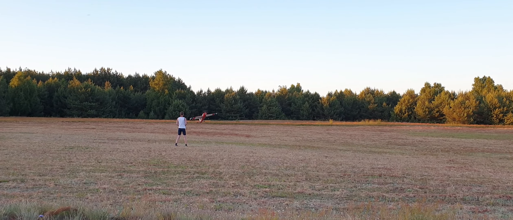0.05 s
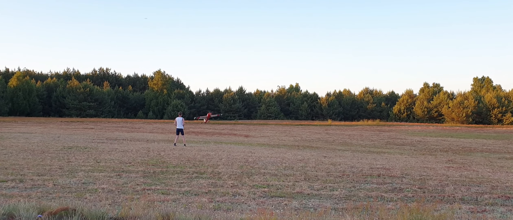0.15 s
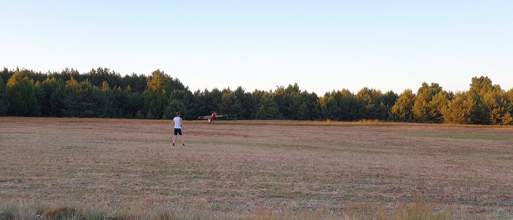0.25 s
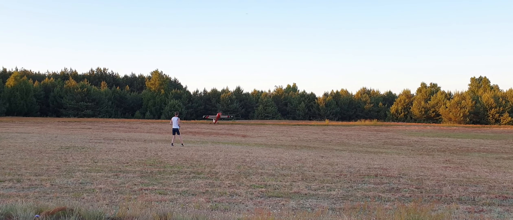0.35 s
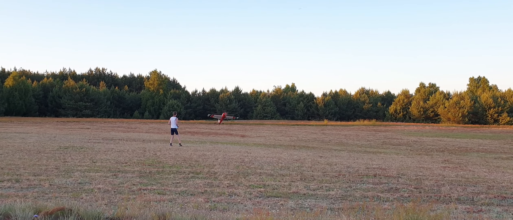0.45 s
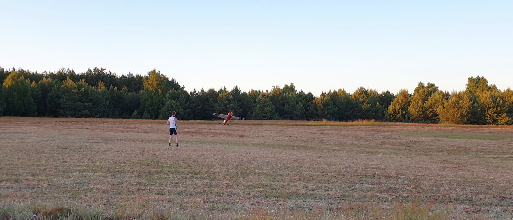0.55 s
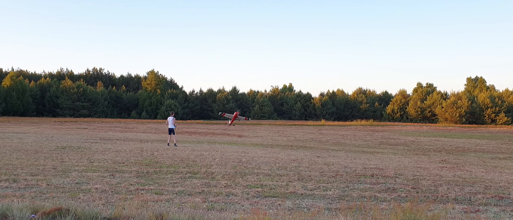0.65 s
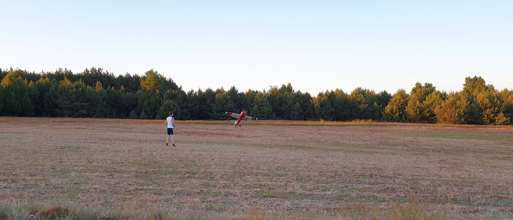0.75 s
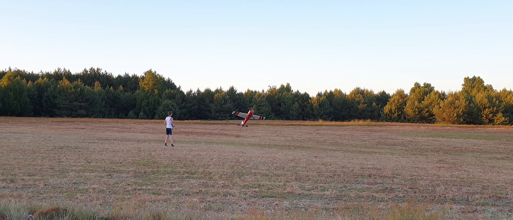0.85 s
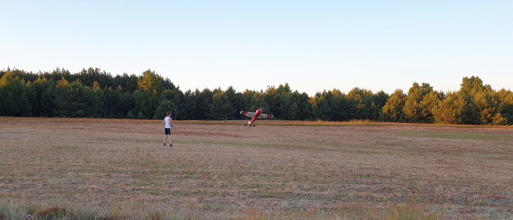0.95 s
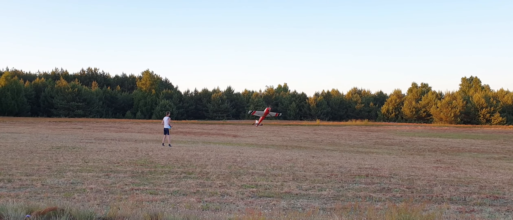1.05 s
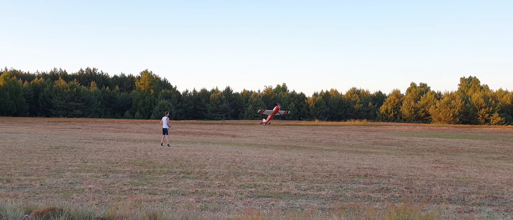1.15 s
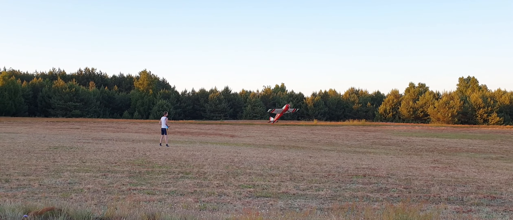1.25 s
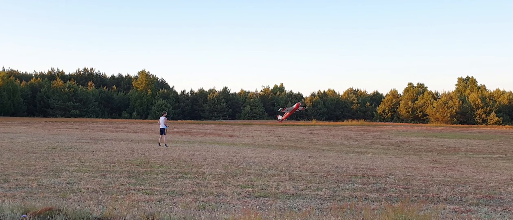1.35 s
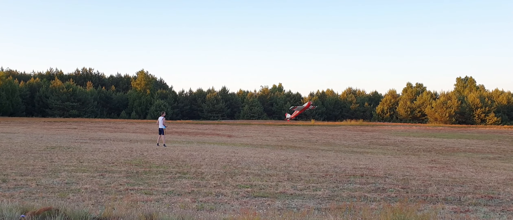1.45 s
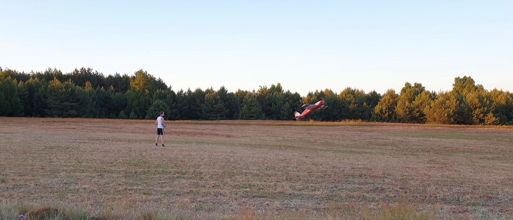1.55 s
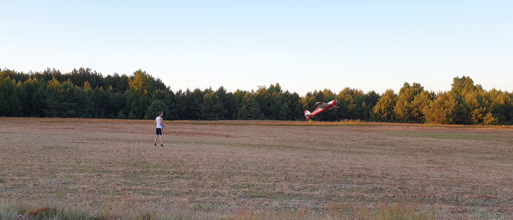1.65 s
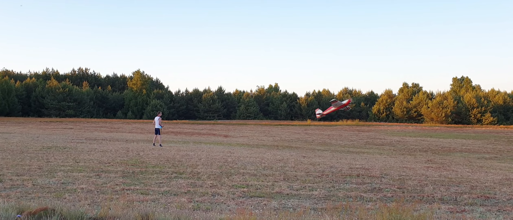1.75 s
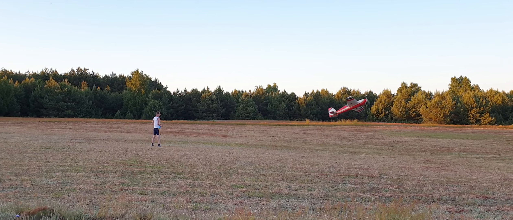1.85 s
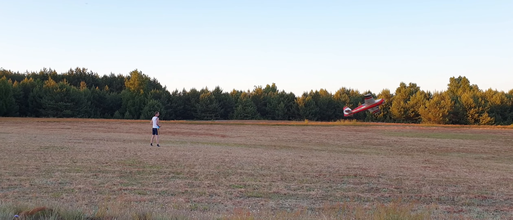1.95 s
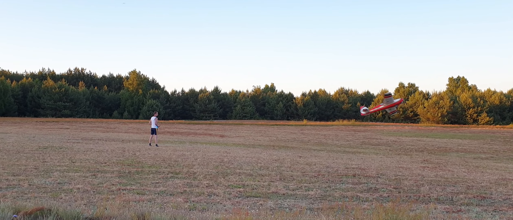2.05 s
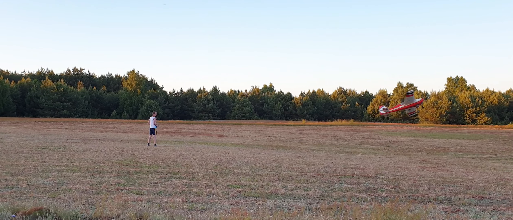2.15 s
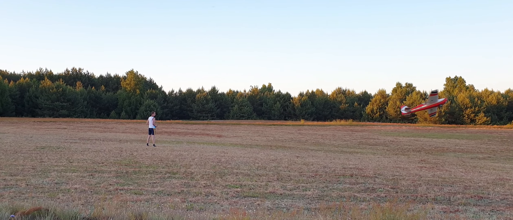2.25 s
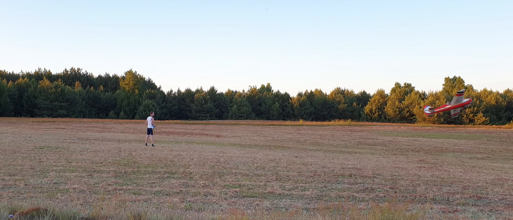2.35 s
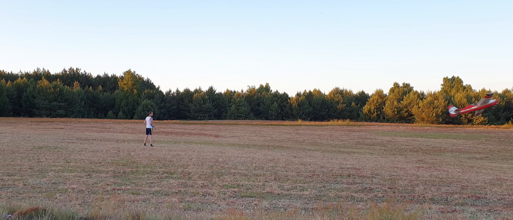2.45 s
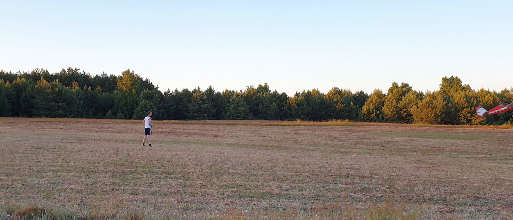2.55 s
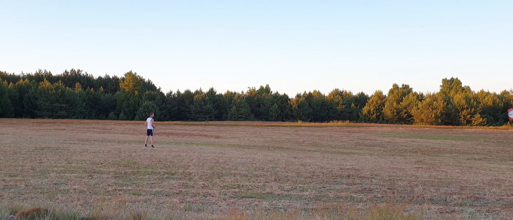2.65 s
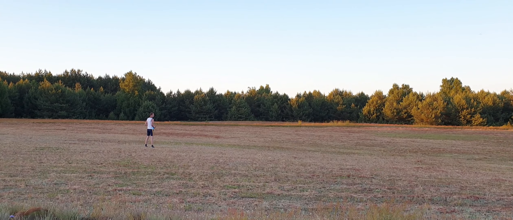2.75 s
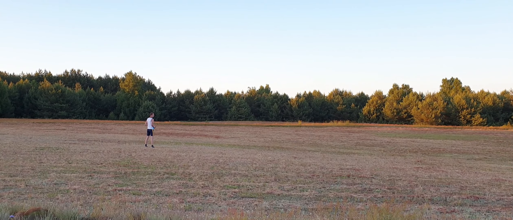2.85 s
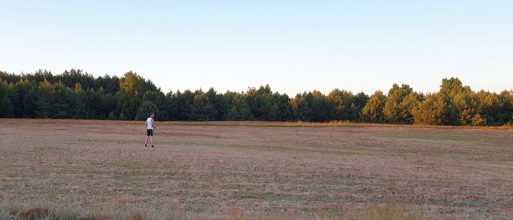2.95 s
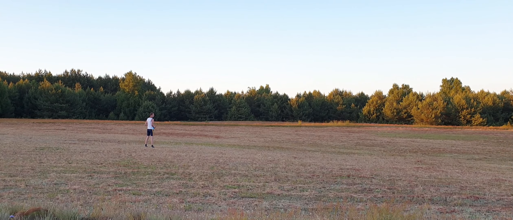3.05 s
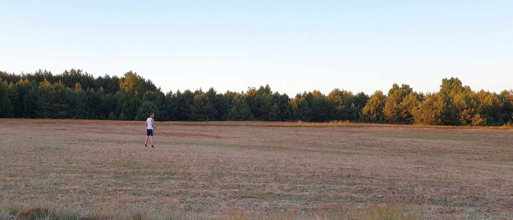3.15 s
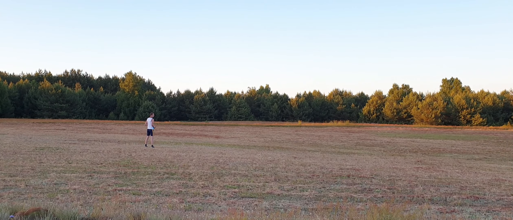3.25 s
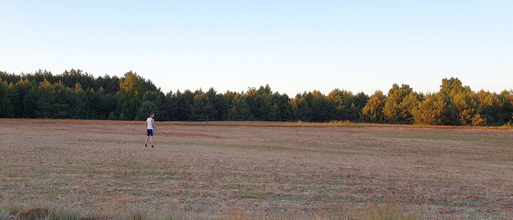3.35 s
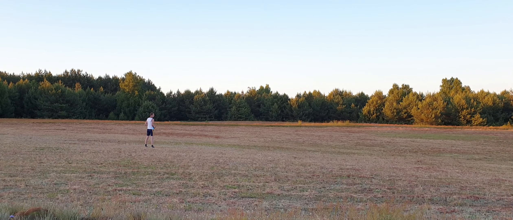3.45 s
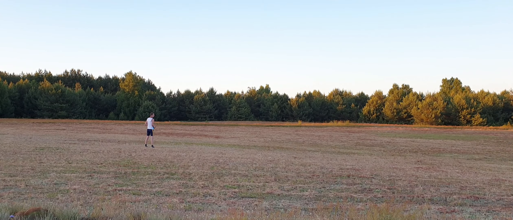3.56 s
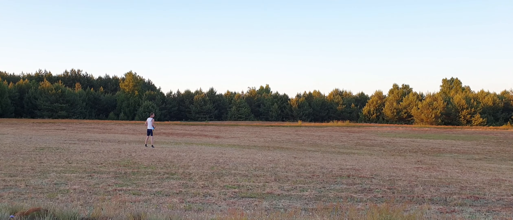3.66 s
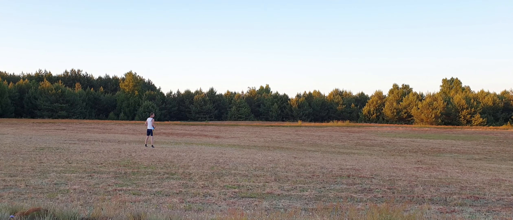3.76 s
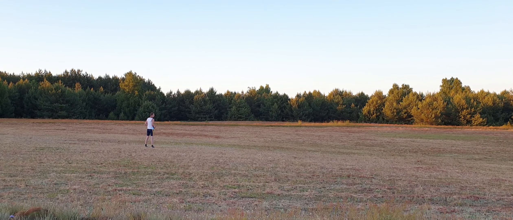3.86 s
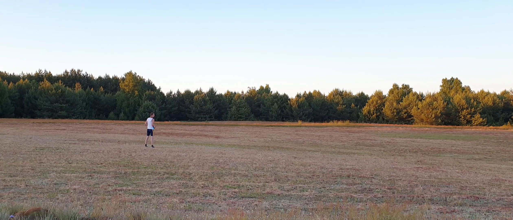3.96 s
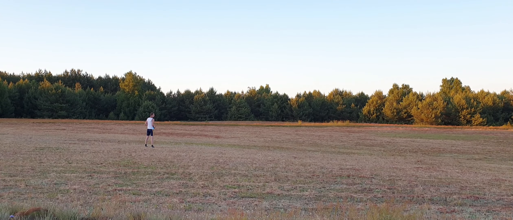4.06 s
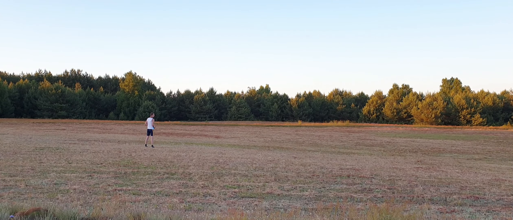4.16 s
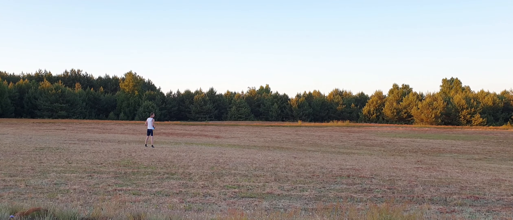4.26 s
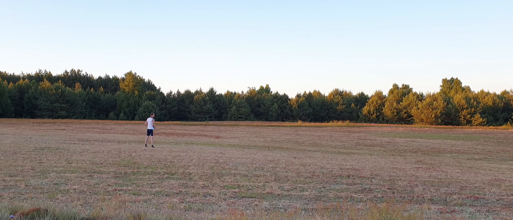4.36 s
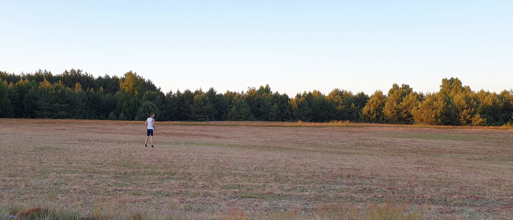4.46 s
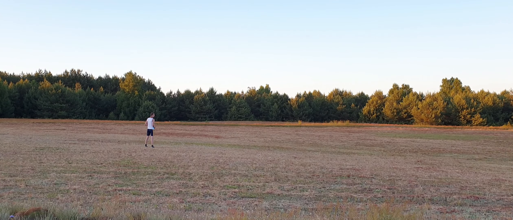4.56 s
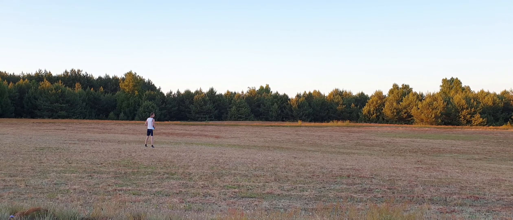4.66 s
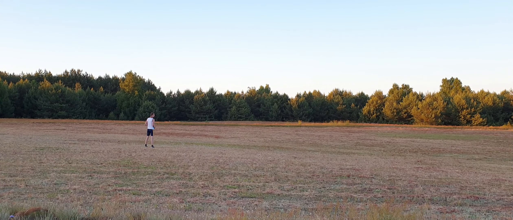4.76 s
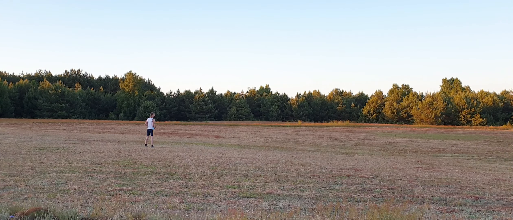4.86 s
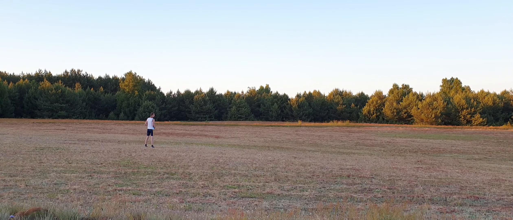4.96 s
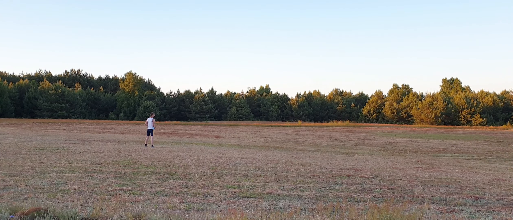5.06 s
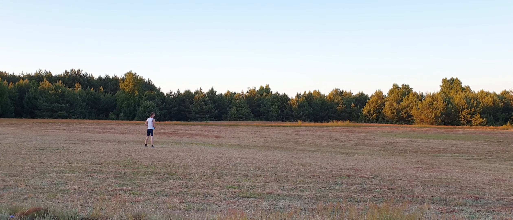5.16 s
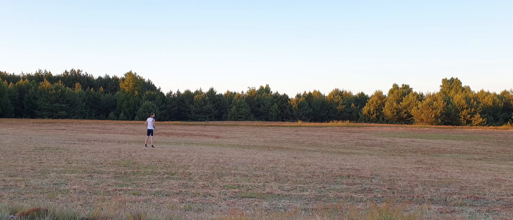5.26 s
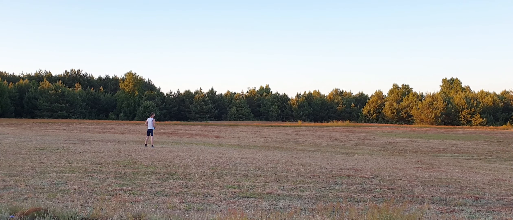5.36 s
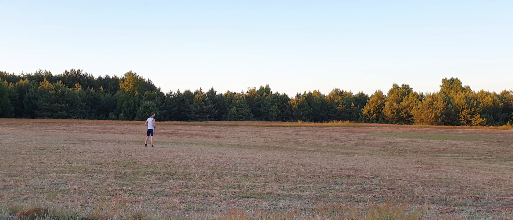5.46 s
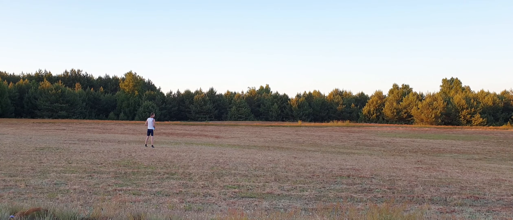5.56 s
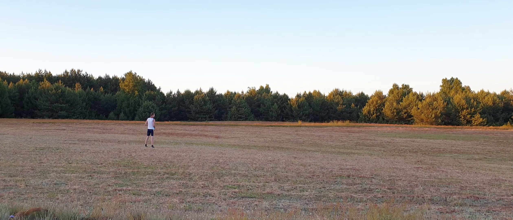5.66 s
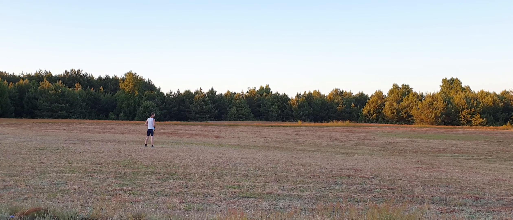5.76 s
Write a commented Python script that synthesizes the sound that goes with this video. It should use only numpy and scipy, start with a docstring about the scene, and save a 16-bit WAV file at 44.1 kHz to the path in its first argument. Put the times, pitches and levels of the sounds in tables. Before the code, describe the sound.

Uneven buzzing putter of a model aeroplane's piston engine, missing beats and catching in short revs, loudest early, then duller and fainter with distance.

```python
"""A small two-stroke engine drives a model plane slowly towards the listener, past on the right and away.
At low throttle it keeps missing turns; short blips of throttle make it catch and rise in pitch.
Each firing is an impulse, filtered into a pop that rings the silencer and adds a fine high sizzle.
The propeller rasps as noise surging with the firings; scattered reflections give the echo of field and trees.
Faint filtered noise is the air of the open field."""
import sys
import numpy as np
from scipy import signal
from scipy.fft import rfft, irfft
from scipy.io import wavfile
from scipy.ndimage import uniform_filter1d, map_coordinates

SR = 44100
rng = np.random.default_rng(int(sys.argv[2]) if len(sys.argv) > 2 else 0)


def generate_wav(signal):
    """Clip the signal to [-1, 1] and save it as 16-bit WAV at the path in sys.argv[1]."""
    frames = np.transpose(np.atleast_2d(signal))
    scaled = np.clip(frames, -1, 1) * 32767
    pcm = np.round(scaled).astype(np.int16)
    wavfile.write(sys.argv[1], SR, pcm)


N = 256203
TIME = np.arange(N) / SR
CRUISE_HZ = 83.8  # turns per second at which the throttle neither adds nor takes level

# Runs of missed turns while the engine sags, mostly every second turn:
# first_miss_s, last_miss_s, turns_from_miss_to_miss, mean_loss_db
STUMBLES = [(.182, .206, 2, -15), (.256, .306, 2, -14), (.6, .649, 2, -14), (.885, .911, 2, -12),
            (1.117, 1.142, 2, -13), (1.169, 1.182, 1, -8), (1.209, 1.222, 1, -7), (1.236, 1.363, 3, -12),
            (1.393, 1.453, 2, -14), (1.677, 1.719, 3, -12), (1.941, 1.967, 2, -10), (2.259, 2.281, 2, -8),
            (2.293, 2.304, 1, -7), (2.328, 2.353, 2, -12), (2.366, 2.417, 2, -11), (2.719, 2.73, 1, -9),
            (2.751, 2.773, 2, -6), (2.785, 2.808, 2, -9), (2.82, 2.87, 2, -12), (3.417, 3.52, 2, -8),
            (3.587, 3.671, 2, -12), (3.889, 3.916, 2, -8), (3.971, 4.028, 2, -11), (4.24, 4.373, 2, -7),
            (4.614, 4.719, 4, -7), (4.762, 4.867, 2, -7), (5.411, 5.558, 2, -7)]

# "aspect" throughout: 0 nose-on, 1 side-on, 2 tail-on


def gain_of(db):
    """Level to amplitude: 20 dB is a factor of ten."""
    return 10 ** (np.asarray(db) / 20)


def evened(x):
    """Normalisation of the mean power to 1."""
    return x / np.sqrt(np.mean(x ** 2) + 1e-20)


def curves(rows):
    """Linear interpolation of each column of a time table, at every sample."""
    s, *columns = np.transpose(rows)
    return [np.interp(TIME, s, column) for column in columns]


def spectra(rows, hz):
    """Interpolation of each column of a frequency table along a logarithmic frequency axis."""
    table_hz, *columns = np.transpose(rows)
    return [np.interp(np.log(hz + 1), np.log(table_hz + 1), column) for column in columns]


def coloured(x, rows, size=4096):
    """Minimum-phase filtering: log gain and phase are a Hilbert pair; one output for each table column."""
    hz = abs(np.fft.fftfreq(size, 1 / SR))
    log_gain = np.log(gain_of(spectra(rows, hz)))
    response = np.exp(np.conj(signal.hilbert(log_gain)))
    taps = np.fft.ifft(response).real[:, :size // 2]
    return signal.oaconvolve(x[None], taps, axes=1)[:, :N]


def blend(layers, position):
    """Linear crossfade between layers as position runs from 0 to the last."""
    position = np.clip(position, 0, len(layers) - 1)
    return sum(x * np.maximum(1 - abs(position - k), 0) for k, x in enumerate(layers))


def at_level(x, db, size=3000):
    """Slow power normalisation to a level curve; single pops keep their contrast."""
    power = uniform_filter1d((x ** 2).mean(0), size)
    power = uniform_filter1d(power, size)
    return x * gain_of(db) / np.sqrt(abs(power) + 1e-20)


def bursts(pops, decay_s):
    """Envelope by convolution, of mean 1: it swells and dies exponentially after each firing."""
    u = np.arange(2000) / SR / decay_s
    envelope = abs(signal.oaconvolve(pops, u * np.exp(-u))[:N])
    return envelope / envelope.mean()


def noise():
    """White noise: equal mean power at every frequency."""
    return rng.standard_normal(N)


def placed(x, lag):
    """Interaural delay: the sound reaches the nearer ear first; lag is that of the left, in samples."""
    left, right = (map_coordinates(x, [np.arange(N) + side * lag / 2], order=3, mode="nearest")
                   for side in (-1, 1))
    return np.array([left, right])


def echo(x, alike_hz=900):
    """Diffuse reflection: sparse scattered taps decay exponentially; the bass is alike at both ears."""
    # Echo from the field and the tree line: frequency_hz, t60_s, level_db
    echo_table = [(79, 0.52, 1.5), (229, 0.64, -15.5), (500, 0.52, -2.5), (1390, 0.82, -14),
                  (4060, 0.37, 0.5)]
    taps = np.zeros((2, SR))
    # one tap of random sign in each stretch of 20 samples
    start = np.arange(200, SR - 20, 20)
    tap_at = start + rng.integers(0, 20, (2, len(start)))
    np.put_along_axis(taps, tap_at, rng.choice([-1., 1.], (2, len(start))), 1)
    hz, t, z = signal.stft(taps, SR, nperseg=256)
    same = 1 / (1 + (hz[:, None] / alike_hz / 2) ** 2)
    z[1] = same * z[0] + np.sqrt(1 - same ** 2) * z[1]
    t60, db = spectra(echo_table, hz)
    z *= gain_of(db[:, None] - 60 * t / t60[:, None])
    tail = signal.istft(z, SR, nperseg=256)[1]
    # mean power gain of 1 between 100 and 1500 Hz
    tail /= np.sqrt(np.mean(abs(rfft(tail, SR)[:, 100:1500]) ** 2))
    return signal.fftconvolve(x[None], tail, axes=1)[:, :N]


def moving_echo(x, renew_s=0.4557, count=3):
    """Equal-power crossfade: as the plane moves, new reflections take over from the old."""
    place = (TIME / renew_s - np.arange(count)[:, None]) % count
    return sum(echo(x * np.sin(np.pi / 2 * np.minimum(p, 2))) for p in place)


def flicker(x, depth_db, patchy_db=2.5, order=7, size=9):
    """Random amplitude modulation: the sound flickers as a whole and in patches of time and frequency."""
    z = signal.stft(x, nperseg=512, noverlap=384)[2]
    chance = uniform_filter1d(rng.standard_normal(z.shape[1:]), order, axis=1)
    whole = evened(chance[0])
    patches = evened(uniform_filter1d(chance, size, axis=0))
    z = z * gain_of(depth_db * whole + patchy_db * patches)
    return signal.istft(z, nperseg=512, noverlap=384)[1][:, :N]


def crankshaft():
    """Rotation rate in turns per second: a linear climb after each catch, then an exponential sag."""
    # The engine catches, gains speed steadily, then sags until it catches again:
    # catch_s, catch_speed_hz, top_s, top_speed_hz, sag_time_constant_s
    surges = [(0.0, 78.59, 0.141, 85.78, 0.15), (0.365, 76.89, 0.565, 87.73, 0.08),
              (0.694, 79.14, 0.819, 82.36, 0.15), (0.951, 75.42, 1.075, 80.1, 1.15),
              (1.443, 65.39, 1.613, 74.96, 0.3), (1.721, 71.25, 1.917, 81.04, 0.07),
              (2.016, 76.42, 2.234, 96.84, 0.09), (2.448, 75.92, 2.699, 104.49, 0.07),
              (3.044, 77.85, 3.262, 95.36, 0.22), (3.726, 69.53, 3.839, 77.86, 0.68),
              (4.029, 69.29, 4.229, 80.68, 0.74), (4.384, 70.55, 4.579, 85.94, 0.17),
              (4.912, 64.23, 5.161, 88.5, 0.84), (5.561, 64.49, 5.855, 91.59, 0.2)]
    speed = np.zeros(N)
    # the last sag heads for 70 turns per second at 6 s
    following = [row[:2] for row in surges[1:]] + [(6, 70)]
    for (catch_s, low_hz, top_s, top_hz, sag_s), (next_s, next_hz) in zip(surges, following):
        climb = np.interp(TIME, [catch_s, top_s], [low_hz, top_hz])
        sag = np.expm1(-np.maximum(TIME - top_s, 0) / sag_s) / np.expm1(-(next_s - top_s) / sag_s)
        speed = np.where(TIME >= catch_s, climb + (next_hz - top_hz) * sag, speed)
    return speed


def loudness(speed, throttle_lead_s=0.039, size=2600):
    """Load dependence of each layer's level: throttle raises it ahead of speed; stumbling shifts it."""
    # Levels at cruising speed as distance and aspect change:
    # time_s, exhaust_thump_db, exhaust_bark_db, silencer_ring_db, propeller_rasp_db, sizzle_db
    cruise_levels = [(0.0, -33.5, -33.5, -45, -39.5, -47.5), (0.7, -32, -30, -39.0, -39.5, -43),
                     (1.2, -29.5, -27.5, -37, -37.5, -39), (1.6, -27, -27, -47.5, -36.5, -46),
                     (2.05, -28, -26.5, -38.5, -37.5, -40), (2.6, -29, -27.5, -48, -38.6, -38),
                     (2.92, -28.5, -32, -69, -39, -50), (3.2, -29, -32.9, -54, -45, -51),
                     (3.7, -33.5, -33.5, -53.1, -47.5, -57), (4.3, -35.5, -38, -69, -57, -65),
                     (4.6, -35.5, -38.5, -53.5, -49.5, -60), (5.05, -36, -37, -50.5, -49.5, -58.5),
                     (5.45, -35.5, -36.5, -52, -48, -65), (5.81, -34, -35.5, -42.5, -48.5, -61)]
    # Response of thump, bark, ring, rasp and sizzle, one row each:
    # db_per_doubling_of_speed, db_while_stumbling
    load = [(16, 0.45), (16.5, 0), (1, -2.5), (19.5, -0.5), (2, -0.2)]
    stumbling = sum(1. * ((TIME > first_s) & (TIME < last_s + every / speed))
                    for first_s, last_s, every, _ in STUMBLES)
    stumbling = uniform_filter1d(np.minimum(stumbling, 1), size)
    coming_speed = np.interp(TIME + throttle_lead_s, TIME, speed)
    throttle = uniform_filter1d(np.log2(coming_speed / CRUISE_HZ), size)
    return [db + speed_db * throttle + stumble_db * stumbling
            for db, (speed_db, stumble_db) in zip(curves(cruise_levels), load)]


def firings(speed, uneven_db=0.66, late_s=0.00156, jitter_s=.00003, miss_spread_db=1.5, after_miss_db=2.5):
    """Two-stroke cycle: one impulse a turn; a misfire is weak and late, and the next firing is harder."""
    turns = np.cumsum(speed) / SR
    s = np.interp(np.arange(1, int(turns[-1]) + 1), turns, TIME)
    chance = rng.standard_normal((len(s), 3))
    burn = np.ones(len(s))
    for first_s, last_s, every, loss_db in STUMBLES:
        first, last = np.argmin(abs(s - first_s)), np.argmin(abs(s - last_s))
        missed = np.arange(first, last + 1, every)
        burn[missed] = gain_of(loss_db + miss_spread_db * chance[missed, 2])
    s = s + late_s * (1 - burn) + jitter_s * chance[:, 0]
    # unburnt fuel makes the next firing harder
    unburnt = 1 - np.roll(burn, 1)
    strength = burn * gain_of(uneven_db * chance[:, 1] + after_miss_db * unburnt)
    pops = np.zeros(N)
    pops[np.clip(np.round(s * SR).astype(int), 0, N - 1)] = strength
    return pops


def fattened(thump, speed, below_hz=112, cruise_db=-1, octave_db=15):
    """Speed-dependent bass gain: harder running fattens the lowest tone."""
    lowest = signal.sosfiltfilt(signal.butter(4, below_hz, fs=SR, output="sos"), thump)
    gain = gain_of(cruise_db + octave_db * np.log2(speed / CRUISE_HZ))
    return thump + lowest * (gain - 1)


def dispersed(x, turn_hz=520):
    """All-pass phase dispersion: each pop becomes a push followed by an equally deep suck."""
    k = np.exp(-2 * np.pi * turn_hz / SR)
    return signal.lfilter([k, -1], [1, -k], x)


def wash(db, apart=1.0):
    """Band-limited noise for the rumble of stirred air, partly uncorrelated between the ears."""
    band = signal.butter(1, [25, 150], "band", fs=SR, output="sos")
    both, left, right = signal.sosfilt(band, rng.standard_normal((3, N)))
    return gain_of(db) * evened(both + apart * np.array([left, right]))


def exhaust(pops, speed, aspect, lag, thump_db, bark_db, puff_db=-12, puff_s=0.0016,
            split_hz=315, steepening=0.77, wash_db=-20, thump_echo=0.72):
    """Directional pulse radiation: pops change colour with aspect, and the echo gains on them."""
    # Colour of one pop; the ground bounce cuts a notch:
    # frequency_hz, nose_on_db, side_on_db, tail_on_db
    pop_colour = [(39.8, -4, -14.5, -13), (73.8, 2, 20, 14), (129, 9.5, 23.5, 15.5), (199, 11, 25.5, 10),
                  (241, 12.5, 25.5, 13.5), (311, 1, 11.5, 2.5), (387, 2, 10, 9), (528, 4.5, 17.5, 7),
                  (622, 10, 17.5, 2), (865, 13, 17, -3), (1206, 12.5, 9, -12), (1360, -1.5, -12, -27),
                  (1950, -37, -9.5, -18), (5040, -86, -40, -52.5)]
    # Turbulent gas in each pop: frequency_hz, nose_on_db, side_on_db, tail_on_db
    puff_colour = [(100, -4, 8, -33), (392, -16, -5.5, 5), (860, 0.5, 6, -0.5), (1220, 7, -7.5, -6),
                   (1756, -0.5, 7.5, -5.5), (2100, -51, -19, -49), (3100, -29, -5.5, -16),
                   (6100, -58, -47, -42.5)]
    wet = gain_of(np.interp(aspect, [0, 1, 1.8, 2], [-10, -8.5, -7.5, -6]))
    thump = blend([evened(x) for x in coloured(pops, pop_colour)], aspect)
    thump = fattened(thump, speed)
    # the bark takes its own power of the pop strength
    hard = pops ** steepening
    bark = blend([evened(x) for x in coloured(dispersed(hard), pop_colour)], aspect)
    gas = bursts(hard, puff_s) * noise()
    puff = blend([evened(x) for x in coloured(gas, puff_colour)], aspect)
    bark = bark + gain_of(puff_db) * puff
    low = signal.butter(6, split_hz, fs=SR, output="sos")
    thump = signal.sosfiltfilt(low, thump)
    bark = bark - signal.sosfiltfilt(low, bark)
    thump = placed(thump, lag) + thump_echo * wet * moving_echo(thump)
    # the stirred air is heard from the side and from behind
    thump = thump + wash(wash_db) * np.minimum(aspect, 1) ** 2
    bark = placed(bark, lag) + wet * moving_echo(bark)
    return at_level(thump, thump_db) + at_level(bark, bark_db)


def silencer(pops, aspect, lag, db, kick_s=0.00036, rough=0.92, wet_db=-8, steepening=0.99):
    """Damped resonance with Doppler shift: each pop rings the modes, higher coming than going."""
    # Modes of the silencer: frequency_hz, width_hz, nose_on_db, side_on_db, tail_on_db
    modes = [(2445, 120, 8, 7.5, 10), (3357, 110, -15, -14, 10.5), (3950, 150, -11, -18, -29),
             (5050, 58, -24, 7.5, -27)]
    doppler = 0.028  # plane's speed over the speed of sound
    hard = pops ** steepening
    drive = evened(hard) + rough * evened(bursts(hard, kick_s) * noise())
    drive = signal.sosfilt(signal.butter(2, [1900, 6500], "band", fs=SR, output="sos"), drive)
    heard_s = np.cumsum(1 + doppler * (1 - aspect)) / SR
    ring = np.zeros(N)
    for hz, width_hz, *view_db in modes:
        turn = np.exp(2j * np.pi * hz * heard_s)
        decay = np.exp(-np.pi * width_hz / SR)
        # shift the mode to zero frequency, let it decay there, shift it back
        mode = (turn * signal.lfilter([1], [1, -decay], drive / turn)).real
        ring += gain_of(blend(view_db, aspect)) * evened(mode)
    return at_level(placed(ring, lag) + gain_of(wet_db) * echo(ring), db)


def propeller(pops, aspect, lag, db, steady=4.8, tail_steady=3.6, swish_s=0.0024, scatter=0.85):
    """Modulated flow noise of blades and intake: it surges with each power stroke, most from behind."""
    # Propeller and intake rasp: frequency_hz, nose_on_db, side_on_db, tail_on_db
    rasp_colour = [(800, -16.5, -6, -38), (1314, 16.5, 10.5, 6.5), (2040, -11, 4.5, 2), (2130, -1.5, 2, 7),
                   (2820, 3.5, 0.5, 4.5), (2970, -4, -4, 0.5), (3780, -4, 0.5, 0), (4270, 3.5, 2, 3.5),
                   (4500, -3, 2.5, -1), (4700, 1.5, 1, 2.5), (5680, 8, -3, 2.5), (7260, -4, -2.5, -9),
                   (8040, -15, -18, -27.5), (12500, -19, -10.5, -21)]
    surge = np.interp(aspect, [1, 1.7], [steady, tail_steady]) + bursts(pops, swish_s)
    direct, left, right = (blend(coloured(surge * noise(), rasp_colour), aspect) for _ in range(3))
    rasp = placed(direct, lag) + scatter * np.array([left, right])
    return flicker(at_level(rasp, db), depth_db=0.05)


def sizzle(pops, aspect, db, steady=1.0, burst_s=0.0012, flicker_db=1.5, far_edge_hz=13000,
           spread_db=2.4, steepening=2.4):
    """Amplitude-modulated high noise that follows the firings: a fine sizzle, mostly at the left."""
    # Fine sizzle: frequency_hz, left_db, right_db
    sizzle_colour = [(5530, 3.5, -70), (7700, 2, -30), (7800, -8, -24), (10180, 2, -1.5), (11340, 5, -13),
                     (13600, 10, -44), (14700, -9, -36), (16700, -28, -37)]
    # How far each firing stands out of the steady sizzle: aspect, burst_share
    burst_share = [(0, .3), (.9, 1.3), (1.2, 3.2), (1.8, .06)]
    uneven = pops ** steepening * gain_of(spread_db * noise())
    envelope = steady + np.interp(aspect, *np.transpose(burst_share)) * bursts(uneven, burst_s)
    # independent noise at each ear
    near = np.array([coloured(envelope * noise(), sizzle_colour)[ear] for ear in range(2)])
    # duller as the plane leaves
    far = signal.sosfilt(signal.butter(6, far_edge_hz, fs=SR, output="sos"), near)
    hiss = blend([near, far], np.interp(aspect, [1.8, 1.9], [0, 1]))
    return flicker(at_level(hiss, db), flicker_db)


def air(db=-49, apart=0.13):
    """Partly correlated ambient noise: the faint rumble and hiss of the open field."""
    # Still evening air: frequency_hz, relative_level_db_per_hz
    air_colour = [(20, -38), (50, -33), (120, -1), (400, 9.5), (1200, -21.5), (4000, -17), (8000, -27),
                  (15000, -42)]
    both, left, right = (evened(coloured(noise(), air_colour)[0]) for _ in range(3))
    return gain_of(db) * evened(both + apart * np.array([left, right]))


def scene():
    """Common excitation and superposition: one crankshaft drives every layer of the plane."""
    # Flight path: time_s, aspect, left_ear_lag_samples
    path = [(0, 0.18, -4.5), (.75, 0.04, -2), (1.2, 0.6, -1), (1.75, 1.02, 1.5), (2.25, 0.99, 6),
            (2.65, 1.37, 9.5), (3.0, 1.72, 14), (5.81, 2.04, 18)]
    # Difference between the two ears: frequency_hz, left_minus_right_db
    balance = [(100, 0.5), (500, -1), (1100, -2), (1700, -1.5), (2500, 0), (3300, -5.5), (4500, -9.5),
               (6500, -1), (8000, 17)]
    aspect, lag = curves(path)
    speed = crankshaft()
    thump_db, bark_db, ring_db, rasp_db, sizzle_db = loudness(speed)
    pops = firings(speed)
    plane = exhaust(pops, speed, aspect, lag, thump_db, bark_db)
    plane = plane + silencer(pops, aspect, lag, ring_db)
    plane = plane + propeller(pops, aspect, lag, rasp_db)
    tilt_db = spectra(balance, np.fft.rfftfreq(N, 1 / SR))[0] / 2
    plane = irfft(rfft(plane) * gain_of([tilt_db, -tilt_db]), N)
    return plane + sizzle(pops, aspect, sizzle_db) + air()


def record(dry, edge_hz=15700):
    """Linear-phase low-pass filtering: the upper band limit."""
    taps = signal.firwin(511, edge_hz, window=("kaiser", 9), fs=SR)
    return signal.oaconvolve(dry, taps[None], "same")


dry = scene()
out = record(dry)
generate_wav(out)
```